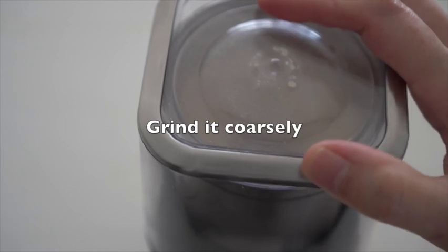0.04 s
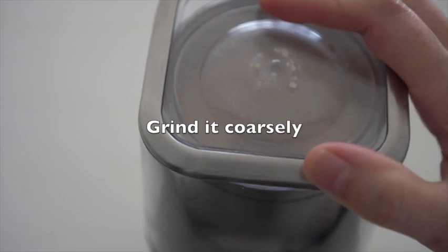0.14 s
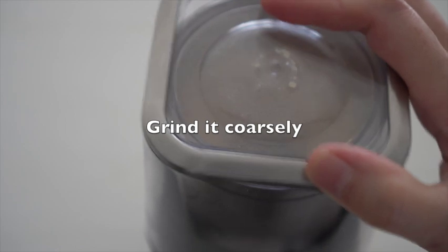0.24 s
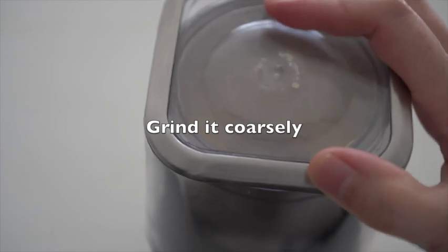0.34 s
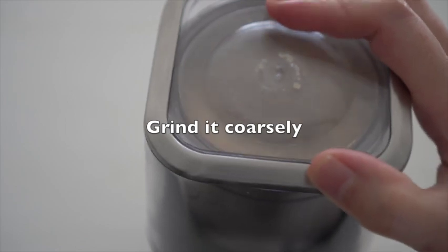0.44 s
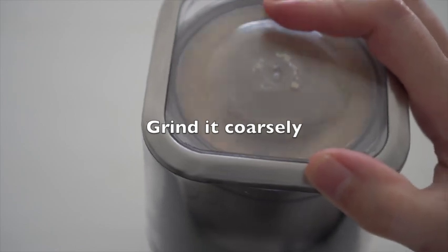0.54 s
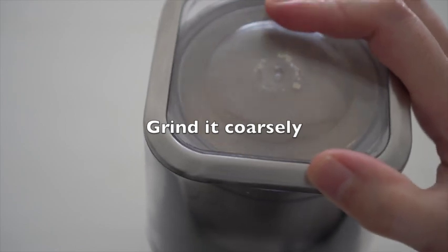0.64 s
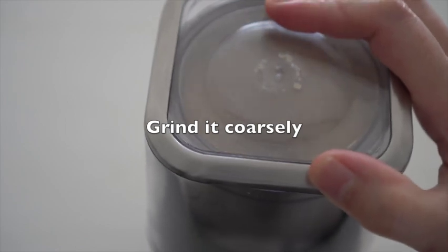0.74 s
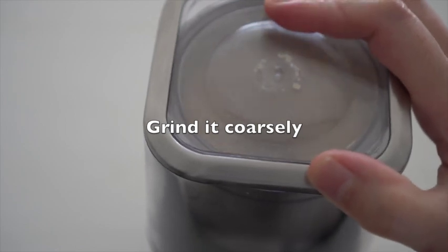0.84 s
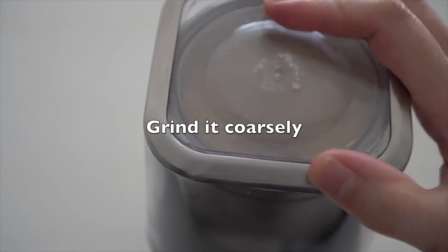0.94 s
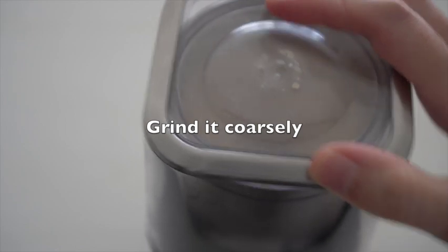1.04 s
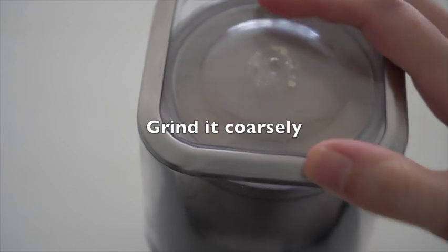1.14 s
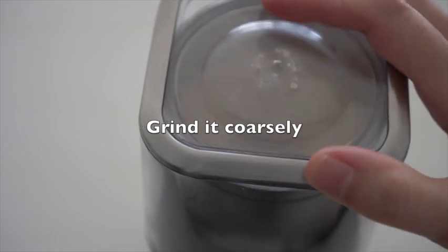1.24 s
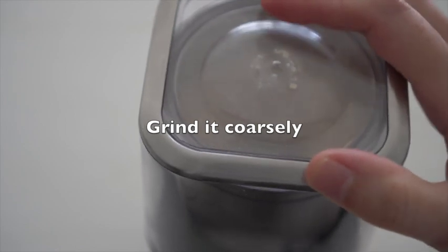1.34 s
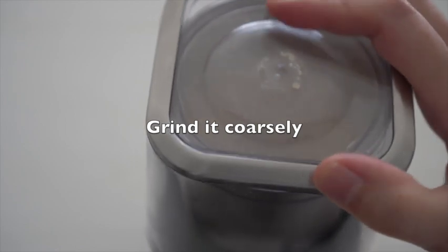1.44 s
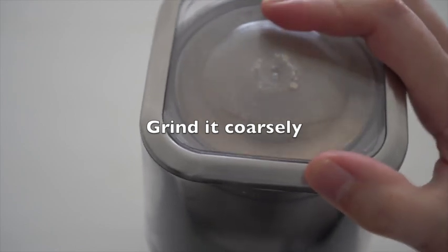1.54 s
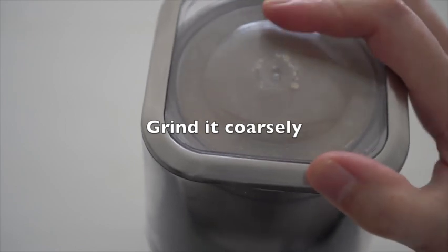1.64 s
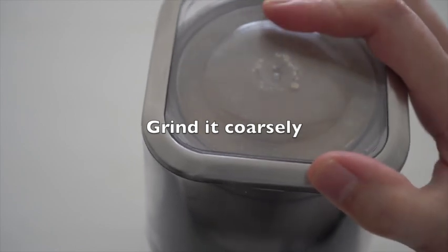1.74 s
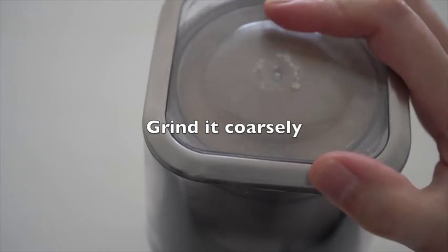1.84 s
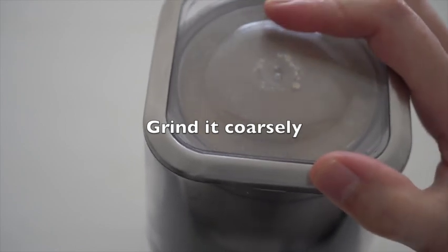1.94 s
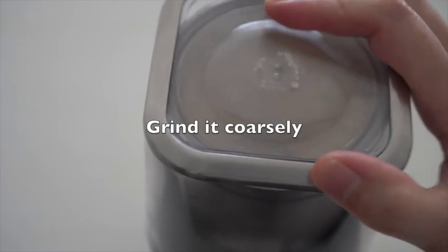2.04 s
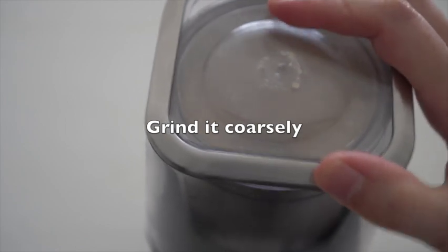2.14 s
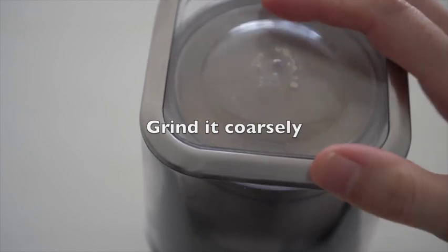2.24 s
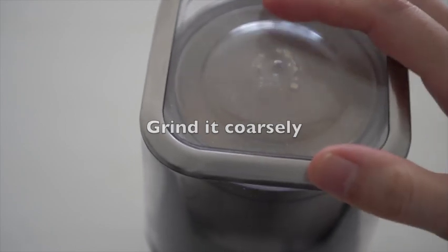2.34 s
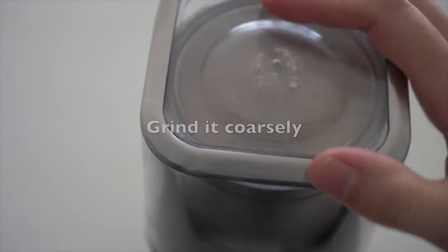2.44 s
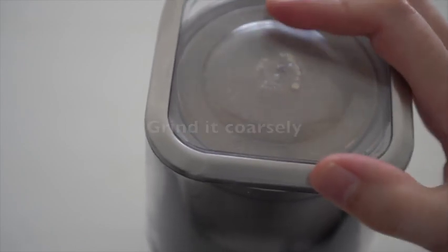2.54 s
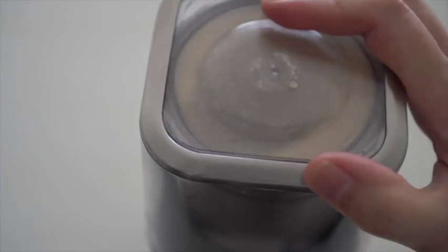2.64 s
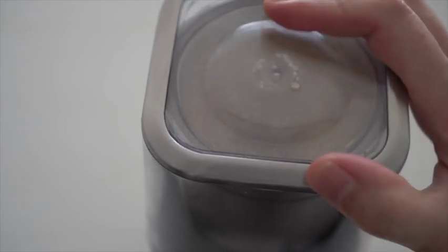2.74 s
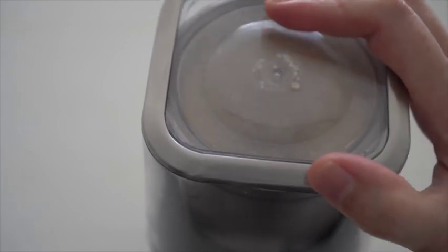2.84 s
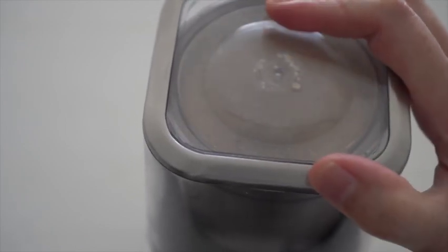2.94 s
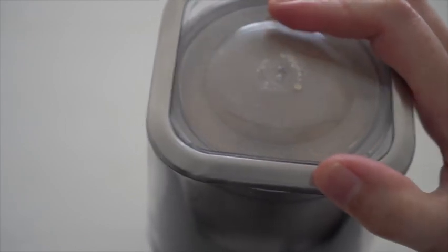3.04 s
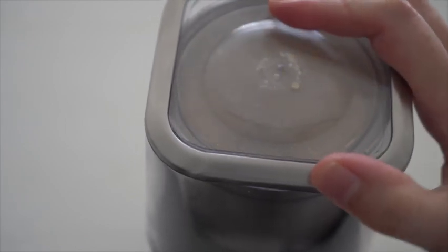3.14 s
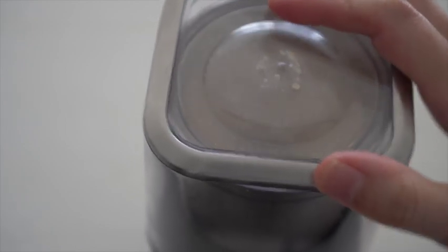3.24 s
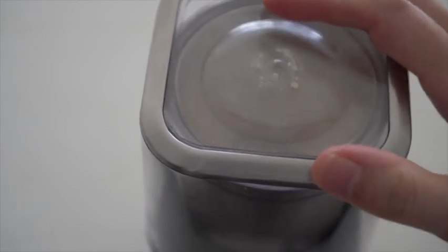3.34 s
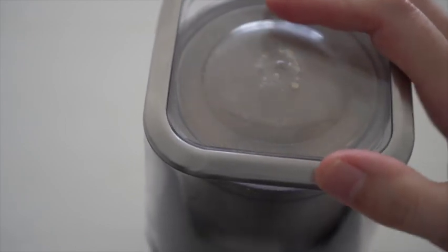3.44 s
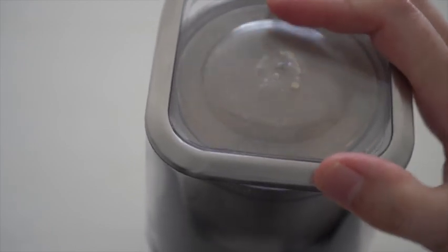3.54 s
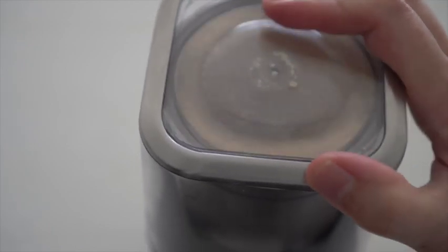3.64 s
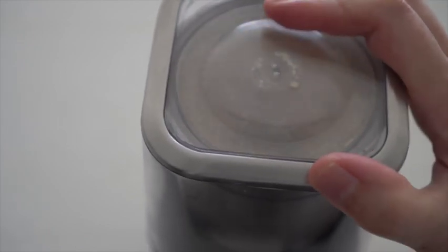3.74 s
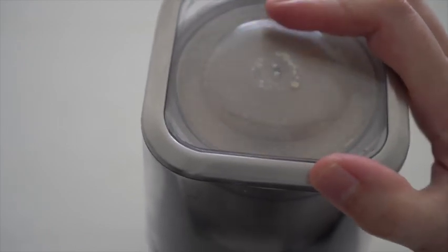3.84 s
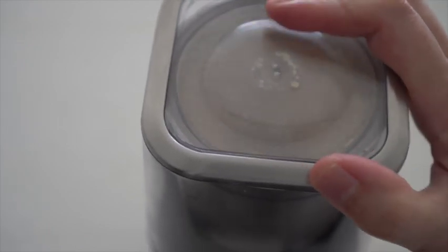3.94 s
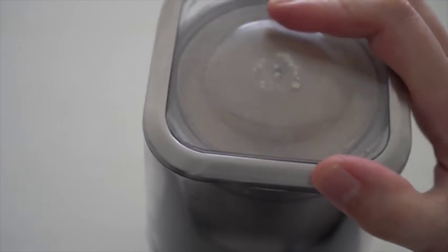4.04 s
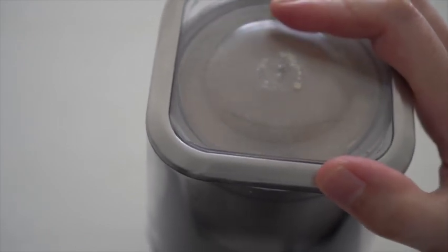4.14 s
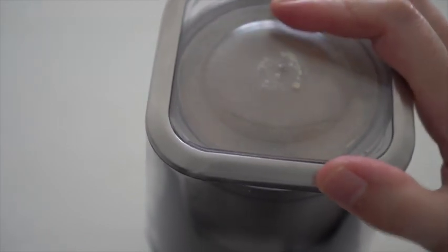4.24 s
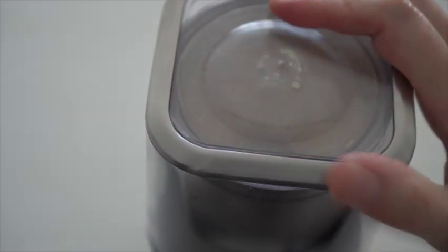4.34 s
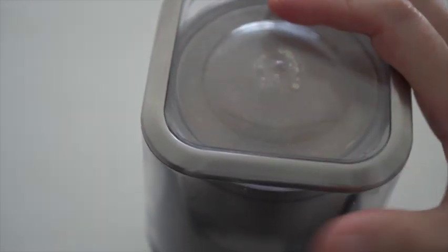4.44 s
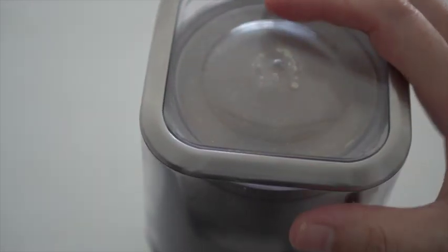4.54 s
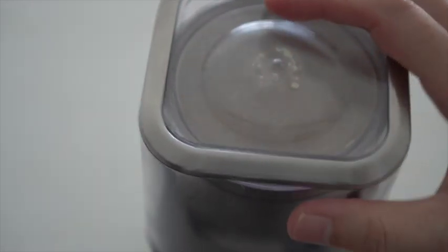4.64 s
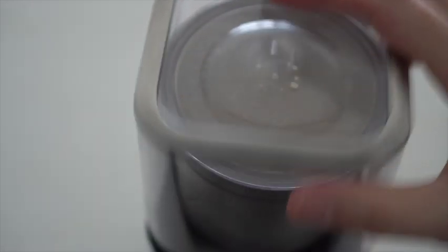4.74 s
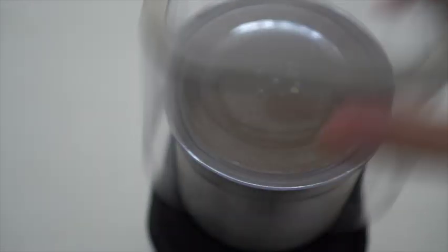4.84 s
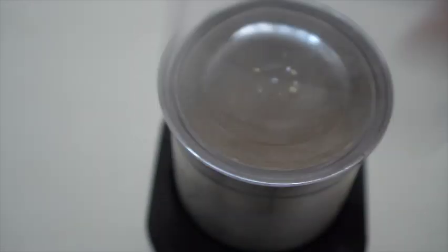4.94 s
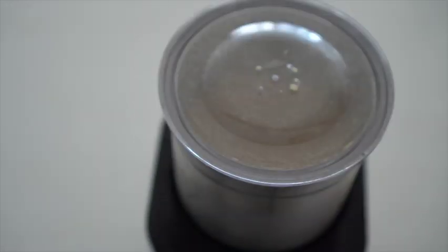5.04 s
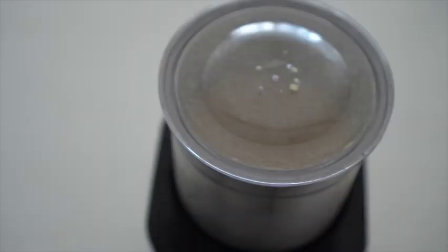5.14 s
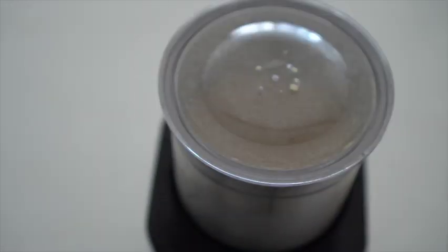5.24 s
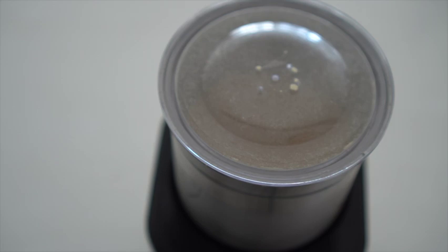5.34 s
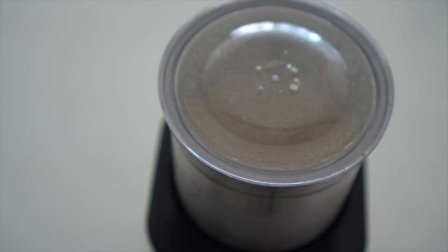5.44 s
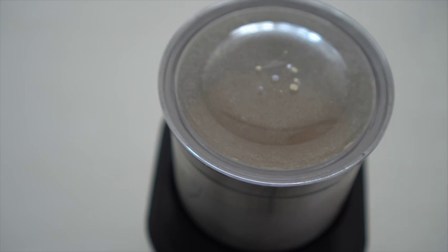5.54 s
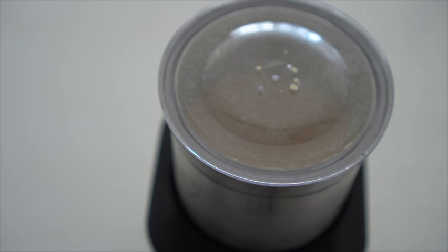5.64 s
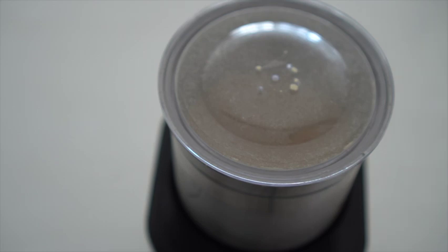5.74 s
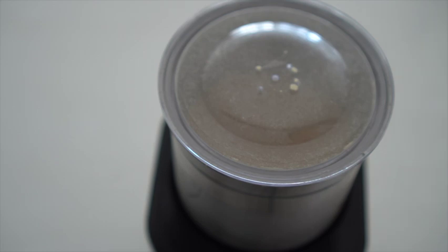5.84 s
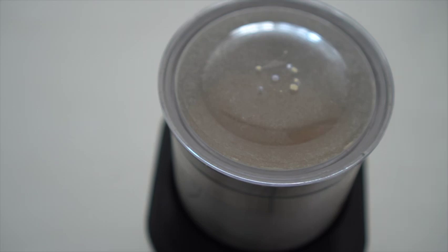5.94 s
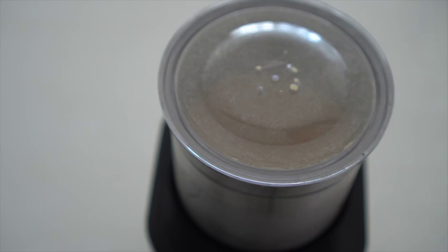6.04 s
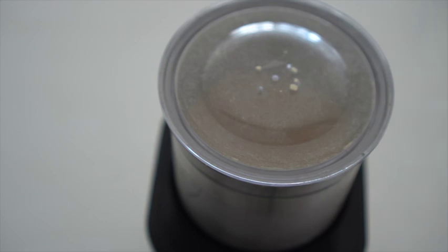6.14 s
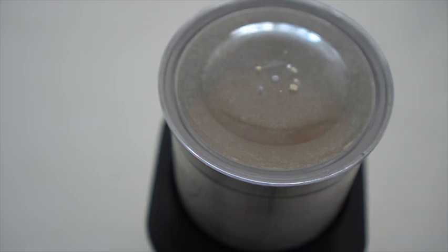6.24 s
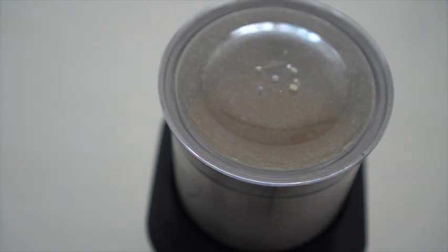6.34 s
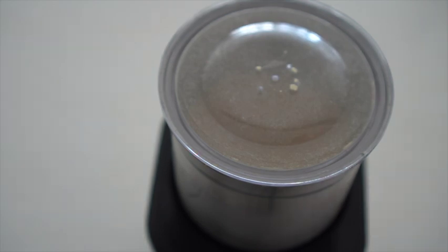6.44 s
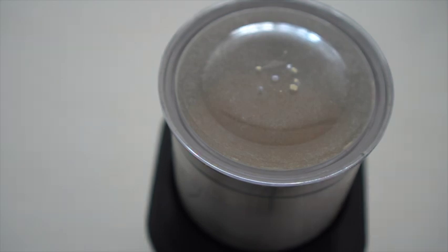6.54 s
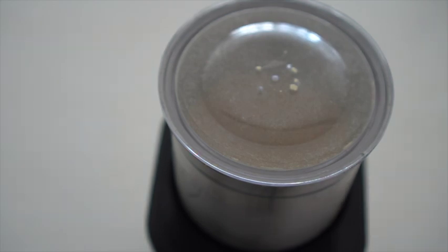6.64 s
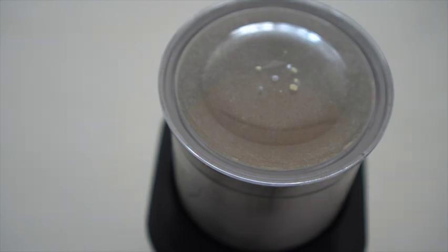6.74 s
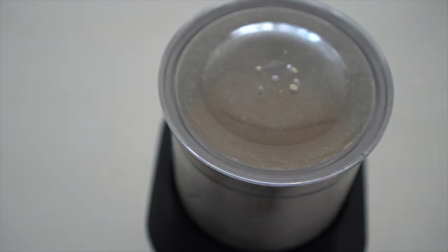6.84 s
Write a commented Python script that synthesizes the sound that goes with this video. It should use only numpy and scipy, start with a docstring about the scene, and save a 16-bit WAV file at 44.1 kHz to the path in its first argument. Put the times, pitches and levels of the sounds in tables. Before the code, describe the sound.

Close to the microphones in a hard-walled kitchen, an electric blade grinder is already spinning down, its rattle and whir fading within the first 0.4 seconds. At about 0.45 a plastic click starts a press: the motor leaps to speed, creeps up in pitch, rattles coarsely, and dry flakes hiss and pelt the steel cup until 1.0, then it coasts down. Similar pulses run from 1.5 to 2.1, 2.6 to 3.1 and 3.6 to 4.2, each followed by a falling, rapidly fading whir. Small sharp clicks come just before and at some presses, strongest near 1.5. The last spin dies by about 4.6. From 4.7 to 4.9 the cover comes off, light ticks growing into a loud, bright plastic clatter. It lands nearby with a hollow knock at 5.5 and a sharper one at 5.75, both echoing in the room. Only soft, steady room tone remains until about 7.

```python
"""Pulsed blade grinder in a hard kitchen

An electric blade grinder coasts down, then is pulsed on a counter by pressing its plastic cover.
At each press the motor whirs up (rotor tones), the drive rattles (random impacts through a housing filter)
and dry flakes pelt the steel cup (grains and hiss through a cup filter); then it coasts down.
The cover comes off with a clatter and is set down nearby (ringing modes and noise cracks); the room rings.
"""
import sys
import numpy as np
from scipy import signal
from scipy.fft import rfft, irfft
from scipy.io import wavfile
from scipy.ndimage import uniform_filter1d

SR = 44100
rng = np.random.default_rng(int(sys.argv[2]) if len(sys.argv) > 2 else 0)


def store_pcm(level_fs):
    """Save levels as 16-bit WAV."""
    pcm = np.round(np.clip(level_fs, -1, 1) * 32767).astype(np.int16)
    wavfile.write(sys.argv[1], SR, np.atleast_2d(pcm).T)


N = 303390
TIME = np.arange(N) / SR

# cover pressed and let go: (motor on [s], motor off [s])
PRESSES = [(-0.6, -0.05), (0.448, 1.005), (1.525, 2.11), (2.597, 3.115), (3.613, 4.185)]
# rotor and bearing tones: (multiple of the turning rate, relative level [dB])
ROTOR_TONES = [(1.41, -40), (2, -30), (3, -33.5), (3.45, -35.5), (4, -26.5), (5, -33), (7, -26), (8, -43),
               (12, -25), (14, -23.5), (20, -33)]
# air resonances that lift a tone passing through: (centre [Hz], width [Hz], lift [dB])
AIR_RESONANCES = [(258, 17, 3.5), (374, 61, 9), (490, 65, 5), (558, 15.4, 11), (644, 23, 15)]
# broad colour of the housing: (frequency [Hz], relative level [dB])
HOUSING_COLOUR = [(30, -77), (120, -42), (190, -19.5), (260, -12.5), (410, -3), (520, 2), (780, -4),
                  (1350, -4.5), (1650, -7.5), (2400, -6), (2950, -10.5), (3700, -17), (4500, -15.5),
                  (7000, -29)]
# resonances of the housing: (centre [Hz], width [Hz], relative level [dB])
HOUSING_RESONANCES = [(269.3, 13.4, 0.5), (333.6, 15, 3.5), (487.5, 19, 3.5), (572, 6.2, -1.5),
                      (640, 14.4, 7), (872.4, 19.7, 4), (1110, 23, -11), (1256, 77, -1), (1401, 69, 1.5),
                      (1750, 17, 0.5), (1970, 150, 0.5), (2090, 20, -26), (2427, 222, -1), (3216, 92, -3.5),
                      (3533, 124, -2.5), (3840, 214, -4.5)]
# broad colour of the steel cup: (frequency [Hz], relative level [dB])
CUP_COLOUR = [(1500, -34), (4200, -2.5), (5600, -8), (6700, -1.5), (7700, -6), (9000, -15), (11500, -6.5),
              (14000, -4), (16000, -16)]
# resonances of the steel cup: (centre [Hz], width [Hz], relative level [dB])
CUP_RESONANCES = [(5100, 330, 1), (5590, 83, 3.7), (8260, 360, 4.1), (8850, 260, 0.86), (9400, 230, 1.4),
                  (10460, 610, 1)]
# contacts on the lidded cup:
# (time [s], ring level [dB], centre of the blow [Hz], crack level [dB], room send [dB])
LID_CONTACTS = [(0.4485, -27, 1810, -25, -17), (1.441, -30, 3530, -32, -16),
                (1.4499, -16, 1200, -19.5, -23), (1.525, -7, 2540, -10, -31), (2.597, -19, 1780, -10, -34),
                (3.517, -24, 2830, -23, -13), (3.544, -46, 2600, -24, -22), (3.613, -12.5, 490, -11, -11),
                (4.729, -20.5, 960, -35, -7), (4.7935, -20.5, 2190, -44, -11), (4.884, -6, 2600, -14, -7),
                (4.890, -3, 1010, -27, -7.5), (4.904, -4, 2200, -17, -6), (4.9231, -2, 1400, -15.5, -25),
                (4.928, -6, 1330, -27, -17)]
# ringing modes of the lidded cup: (frequency [Hz], relative level [dB], T60 [s])
LID_MODES = [(472, -9, 0.11), (667, 6, 0.11), (935, -7, 0.026), (982, 8.5, 0.04), (1360, 4, 0.018),
             (1583, 2, 0.026), (1885, -8.5, 0.03), (2110, -7, 0.052), (2750, -21, 0.04), (2840, -11, 0.028),
             (3260, -1, 0.028), (4660, 8, 0.037), (7200, -19, .02)]
# colour of the crack on the lidded cup: (frequency [Hz], relative level [dB])
LID_CRACK = [(60, -27), (250, -9.5), (700, 4.5), (2700, -1), (4500, -3), (6000, -10), (11000, -10.5),
             (16000, -23)]
# the cover lands on the counter, one edge and then the other:
# (time [s], ring level [dB], centre of the blow [Hz], crack level [dB], room send [dB])
COVER_LANDINGS = [(5.5195, -1, 503, -31, 3), (5.7455, -6.5, 1700, -10.5, 3.5)]
# ringing modes of the free cover: (frequency [Hz], relative level [dB], T60 [s])
COVER_MODES = [(490, -3.5, 0.032), (580, -0.5, 0.039), (618, 2, 0.033), (901.4, -5, 0.15), (1016, -3, 0.08),
               (1490, -6.5, 0.03), (1890, -2.5, 0.04), (2770, -3, 0.018), (4140, -15, 0.39),
               (6430, -3.5, 0.036)]
# colour of the crack on the counter: (frequency [Hz], relative level [dB])
COUNTER_CRACK = [(50, -34), (110, -8), (250, -5), (700, 3), (1300, -3), (2700, 6), (4500, -4),
                 (6000, -13.5), (11000, -11.5), (16000, -16)]
# decay of the kitchen: (frequency [Hz], T60 [s])
ROOM_DECAY = [(100, 1.0), (500, 0.73), (1000, 0.77), (4000, 0.94), (8000, 0.86), (15000, 0.65)]
# colour of the kitchen reflections: (frequency [Hz], relative level [dB])
ROOM_TINT = [(100, -15), (1000, 5), (3000, -1.5), (6000, 0), (15000, -14.5)]
# colour of the room tone: (frequency [Hz], relative level [dB])
ROOM_TONE = [(30, -36), (70, -38), (110, -13), (220, -11.5), (370, -4), (550, -1.5), (720, -2), (930, 4.5),
             (1200, -5), (2400, -9), (4650, -20.5), (16000, -24)]
# gain of the side signal, which sets the stereo width: (frequency [Hz], gain [dB])
SIDE_GAIN = [(50, -24), (200, -23.5), (700, -11), (1400, -16), (2800, -9), (5500, -5.5), (14000, -5.5)]

MAINS_HZ = 50
# the motor leaps to speed, then creeps higher as the flakes break up
LEAP_TURNS_PER_S, LEAP_S, CREEP_TURNS_PER_S, CREEP_S = 145, 0.043, 33, 0.39
# with the current off, drag and friction slow it
DRAG_S, FRICTION_TURNS_PER_S = 0.46, 75
# the flakes are whirled up, keep circling after the switch opens, then drop to the bottom
WHIRL_UP_S, CIRCLING_S, DROP_S = 0.073, 0.21, 0.019


def motor():
    """Turns per second and current: a quick run-up, a slow creep, then drag and friction."""
    turns, powered = np.zeros(N), np.zeros(N)
    for on, off in PRESSES:
        driven_s = np.clip(TIME - on, 0, off - on)
        coasted_s = np.maximum(TIME - off, 0)
        leap = LEAP_TURNS_PER_S * (1 - np.exp(-driven_s / LEAP_S))
        creep = CREEP_TURNS_PER_S * np.minimum(driven_s / CREEP_S, 1)
        slowing = np.exp(-coasted_s / DRAG_S)
        press_turns = (leap + creep + FRICTION_TURNS_PER_S) * slowing - FRICTION_TURNS_PER_S
        turns = np.maximum(turns, press_turns)
        powered[(TIME > on) & (TIME < off)] = 1
    return turns, powered


def load(full_db, start_db, sag_db, drop_db, fade_db_per_s, fade_db_per_s2):
    """Gain per press: swells, holds, sags as flakes circle on, steps down as they drop, fades ever faster."""
    gain = np.zeros(N)
    for on, off in PRESSES:
        whirled = np.clip((TIME - on) / WHIRL_UP_S, 0, 1)
        coasted = np.clip((TIME - off) / CIRCLING_S, 0, 1)
        dropped_s = np.clip(TIME - off - CIRCLING_S, 0, 1)
        step_db = drop_db * np.minimum(dropped_s / DROP_S, 1)
        fade_db = fade_db_per_s * dropped_s + fade_db_per_s2 * dropped_s ** 2
        level_db = full_db + start_db * (1 - whirled) - sag_db * coasted - step_db - fade_db
        gain = np.maximum(gain, (TIME > on) * from_db(level_db))
    return gain


def rattle(turns, speed, throb=0.082, knock_share=0.27, flutter_db=0.9):
    """The loose drive knocks about twice a turn and coarse bits tumble; both shake the housing."""
    cycle = np.cumsum(turns) / SR
    half_turns = np.floor(2 * cycle + 0.12 * drift(150))
    knocks = np.diff(half_turns, prepend=0) * rng.standard_normal(N) / np.sqrt(turns + 5)
    swing = (1 + throb * np.sin(2 * np.pi * cycle)) * from_db(flutter_db * drift(30))
    impacts_per_s = 500 + 5000 * speed
    mid = knock_share * rms_one(knocks) + swing * grains(impacts_per_s, 1.7)
    side = swing * grains(impacts_per_s, 1.4)
    return stereo(*[rms_one(colour(x, HOUSING_COLOUR, HOUSING_RESONANCES)) for x in (mid, side)])


def flakes(speed, powered, surge=0.19, hiss=0.82, clump_db=1.04, ringing=0.32, decay_s=0.0041):
    """Flakes pelt the steel cup in clumps over a hiss; both surge with each half wave of the mains."""
    surging = 1 + surge * powered * np.sin(4 * np.pi * MAINS_HZ * TIME)
    swing = surging * from_db(clump_db * drift(25))
    impacts_per_s = 600 + 6000 * speed
    near, far = [swing * (grains(impacts_per_s, 2.7) + hiss * rng.standard_normal(N)) for _ in range(2)]
    mid = near + ringing * scatter(near, decay_s)
    side = scatter(near, decay_s) + 0.7 * far
    return stereo(*[rms_one(colour(x, CUP_COLOUR, CUP_RESONANCES)) for x in (mid, side)])


def scatter(x, decay_s):
    """Quick reflections inside and around the cup leave fine, fixed peaks in the spectrum."""
    t = TIME[:1024]
    echoes = rng.standard_normal(len(t)) * np.exp(-t / decay_s)
    return signal.fftconvolve(x, echoes / np.linalg.norm(echoes))[:len(x)]


def whir(turns, speed, powered, waver_db=1.93, wobble_rad=0.072, blade_growth=2.54, coasting_db=-7):
    """Rotor tones swell across air resonances; all but the two-blade tone weaken without current."""
    angle = 2 * np.pi * np.cumsum(turns) / SR + wobble_rad * drift(24.6)
    current = uniform_filter1d(powered, size=2205)
    # half of coasting_db stays on even under full current
    drive = speed ** 3.4 * from_db(coasting_db * (1.5 - current))
    tones = np.zeros(N)
    for multiple, db in ROTOR_TONES:
        swell_db = sum(lift / (1 + ((multiple * turns - hz) / width) ** 2)
                       for hz, width, lift in AIR_RESONANCES)
        growth = speed ** blade_growth if round(multiple) == 2 else drive
        level = from_db(db + swell_db + waver_db * drift(12.0)) * growth
        tones += level * np.sin(multiple * angle + rng.uniform(0, 2 * np.pi))
    return small_body(tones)


def mains_hum(powered):
    """While current flows, a faint tone sounds at twice the mains frequency."""
    return from_db(-63.5) * uniform_filter1d(powered, size=800) * np.sin(4 * np.pi * MAINS_HZ * TIME)


def blows(contacts, modes, crack_colour, blow_octaves, crack_s, uneven_db, width):
    """Each contact cracks and rings the modes near its blow's centre; gives direct sound and room send."""
    t = TIME[:SR // 2]
    hz, mode_db, t60 = np.transpose(modes)[:, :, None]
    onset = 1 - np.exp(-t * hz / 0.64)
    waves = np.cos(2 * np.pi * hz * t) * np.exp(-np.log(1000) * t / t60) * onset
    direct, side, sent = np.zeros((3, N))
    for s, ring_db, centre_hz, crack_db, room_db in contacts:
        reach = 1 / (1 + (np.log2(hz / centre_hz) / blow_octaves) ** 4)
        gains = from_db(mode_db + uneven_db * rng.standard_normal(hz.shape)) * reach
        ringing = small_body(np.sum(rng.choice([-1, 1], hz.shape) * gains * waves, 0))
        ring = from_db(ring_db) * ringing / np.linalg.norm(gains) / 2
        bursts = rng.standard_normal((2, len(t))) * np.exp(-t / crack_s)
        crack, crack_side = [from_db(crack_db) * colour(burst, crack_colour) for burst in bursts]
        # the room is sent a single click in the crack's colour, scaled from the noise burst's strength
        click_level = from_db(crack_db + 3.0) * np.sqrt(crack_s * SR / 2)
        room_click = click_level * colour(signal.unit_impulse(len(t)), crack_colour)
        start = round(s * SR)
        span = slice(start, start + len(t))
        direct[span] += ring + crack
        side[span] += crack_side + width * ring
        sent[span] += from_db(room_db) * (ring + room_click)
    return stereo(direct, side), sent


def kitchen(x):
    """Dense reflections off hard walls build up quickly and die band by band."""
    t = TIME[:SR * 5 // 4]
    edges, tail = np.geomspace(60, 17000, 13), np.zeros((2, len(t)))
    for low, high in zip(edges, edges[1:]):
        band_filter = signal.butter(2, [low, high], "band", fs=SR, output="sos")
        band = signal.sosfilt(band_filter, rng.standard_normal(tail.shape))
        hz = np.sqrt(low * high)
        decay = np.exp(-np.log(1000) * t / at_hz(ROOM_DECAY, hz))
        tail += band * from_db(at_hz(ROOM_TINT, hz)) * decay
    build_up = 1 - np.exp(-(t / 0.0064) ** 2)
    reflections = stereo(*tail * build_up) / np.sqrt(0.06 * SR)
    return signal.fftconvolve(x[None], reflections, axes=1)[:, :N]


def room_tone(level_db=-57.5):
    """Steady coloured noise fills the quiet kitchen."""
    tone = stereo(*[rms_one(colour(x, ROOM_TONE)) for x in rng.standard_normal((2, N))])
    return tone * from_db(level_db)


def small_body(x, corner_hz=200):
    """A small object radiates little bass."""
    return signal.sosfilt(signal.butter(3, corner_hz, "high", fs=SR, output="sos"), x + 1e-18)


def grains(per_s, spread_db):
    """Random impacts of uneven size and either sign, scaled to rms 1."""
    born = rng.random(N) < per_s / SR
    sizes = from_db(spread_db * np.minimum(rng.exponential(1, N), 4)) * rng.choice([-1, 1], N)
    return rms_one(born * sizes / np.sqrt(per_s))


def stereo(mid, side):
    """Close microphones hear the same bass and differing treble."""
    return mid + colour(side, SIDE_GAIN) * np.array([[1], [-1]])


def colour(x, spectrum, modes=(), size=8192):
    """Causal filter with a broad spectrum and resonances standing out of it."""
    hz = np.maximum(np.arange(size // 2 + 1) * SR / size, 1)
    power = from_db(at_hz(spectrum, hz)) ** 2
    for centre, width, db in modes:
        power = power + from_db(db) ** 2 / (1 + ((hz - centre) / width) ** 2) ** 2
    # folding the cepstrum onto positive times gives minimum phase
    cepstrum = irfft(np.log(power) / 2)[:size // 2]
    cepstrum[0] /= 2
    impulse = irfft(np.exp(rfft(2 * cepstrum, size)))
    return signal.fftconvolve(x, impulse)[:len(x)]


def drift(rate_hz):
    """Slow random wander with rms near 1: low-passed noise, one point every 40 samples."""
    r = np.exp(-80 * np.pi * rate_hz / SR)
    noise = rng.standard_normal(N // 40 + 2002)
    slow = signal.lfilter([1], [1, -2 * r, r * r], noise)[2000:]
    return np.interp(np.arange(N) / 40, np.arange(len(slow)), rms_one(slow))


def at_hz(points, hz):
    """Read a table of (frequency [Hz], value) on a log-frequency axis."""
    f, value = np.transpose(points)
    return np.interp(np.log(np.maximum(hz, 1)), np.log(f), value)


def rms_one(x):
    """Scale to rms 1."""
    return x / np.sqrt(np.mean(x ** 2) + 1e-20)


def from_db(db):
    """Decibels to gain."""
    return 10 ** (np.asarray(db) / 20)


def scene():
    """Grinder and knocks stand close to the microphones, the kitchen lies behind."""
    turns, powered = motor()
    speed = turns / turns.max()
    grind = rattle(turns, speed) * load(full_db=-18.0, start_db=-7.5, sag_db=1.6, drop_db=2.5,
                                        fade_db_per_s=51, fade_db_per_s2=109)
    grind += flakes(speed, powered) * load(full_db=-26.5, start_db=-11.0, sag_db=0.15, drop_db=3.0,
                                           fade_db_per_s=49.5, fade_db_per_s2=200)
    tones = whir(turns, speed, powered)
    clicks, clicks_sent = blows(LID_CONTACTS, LID_MODES, LID_CRACK, blow_octaves=0.44,
                                crack_s=0.0065, uneven_db=1.0, width=0.12)
    knocks, knocks_sent = blows(COVER_LANDINGS, COVER_MODES, COUNTER_CRACK, blow_octaves=1.4,
                                crack_s=0.0031, uneven_db=0.2, width=-2.5)
    grinder_sent = from_db(-9) * tones + from_db(-13) * grind.mean(0)
    room = kitchen(clicks_sent + knocks_sent + grinder_sent)
    # the grinder sits slightly to the left
    grinder = (grind + tones + mains_hum(powered)) * from_db([[0.15], [-0.15]])
    return grinder + clicks + knocks + room + room_tone()


def record(dry):
    """A limiter ducks the highest peaks and recovers; a steep low-pass cuts the top."""
    ceiling_db, release_db_per_s, cutoff_hz = -4.5, 110, 15900
    over_db = np.maximum(20 * np.log10(np.abs(dry).max(0) + 1e-9) - ceiling_db, 0)
    # each peak's reduction is released along a straight line in dB
    held_db = np.maximum.accumulate(over_db + release_db_per_s * TIME) - release_db_per_s * TIME
    limited = dry * from_db(-uniform_filter1d(held_db, size=24))
    return signal.sosfilt(signal.ellip(10, 0.3, 80, cutoff_hz, fs=SR, output="sos"), limited)


dry = scene()
out = record(dry)
store_pcm(out)
```